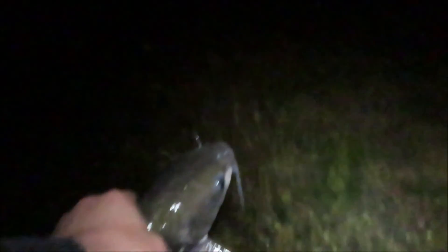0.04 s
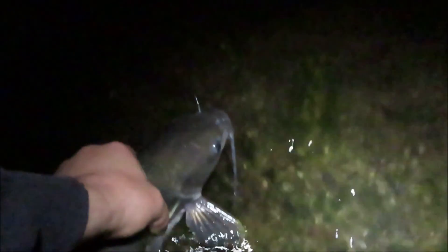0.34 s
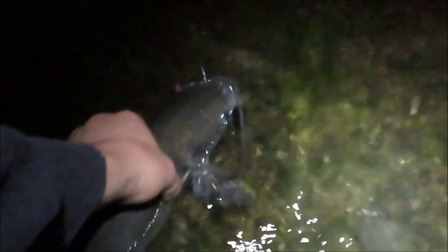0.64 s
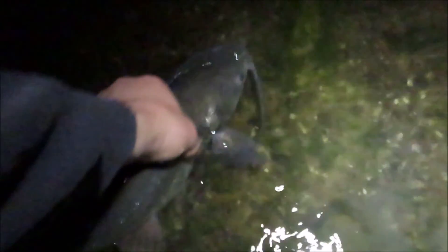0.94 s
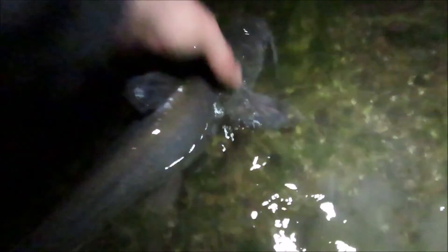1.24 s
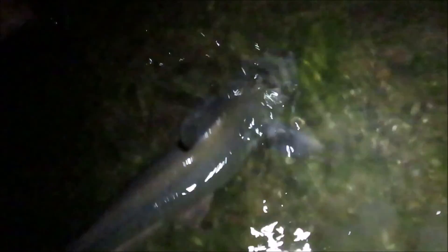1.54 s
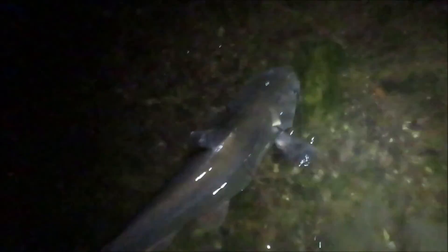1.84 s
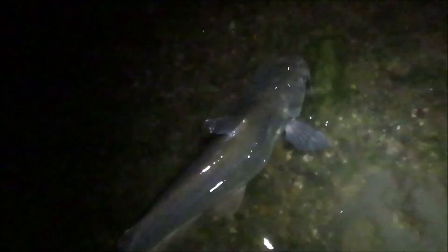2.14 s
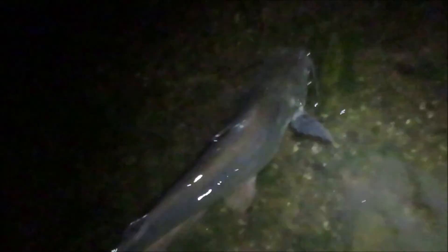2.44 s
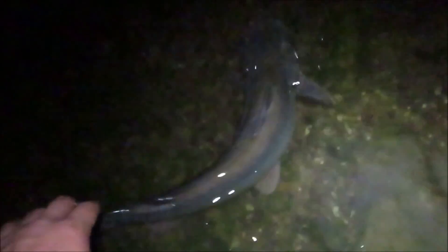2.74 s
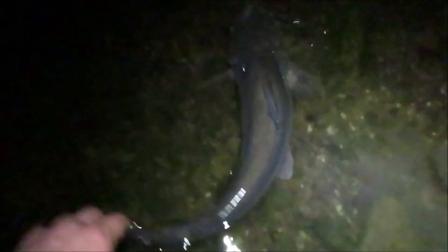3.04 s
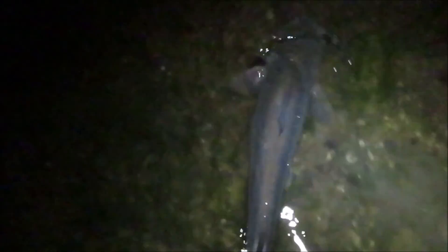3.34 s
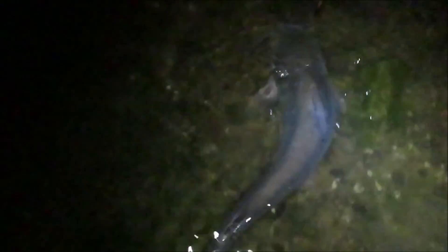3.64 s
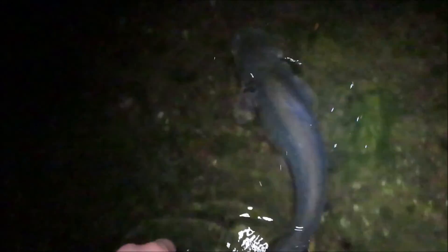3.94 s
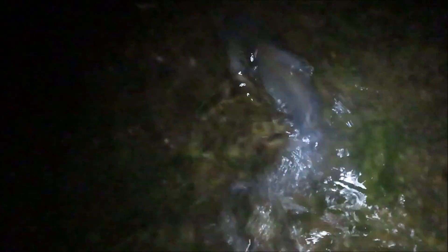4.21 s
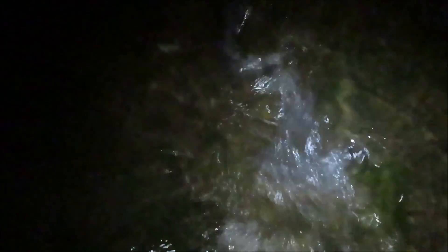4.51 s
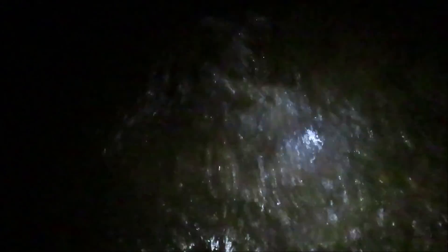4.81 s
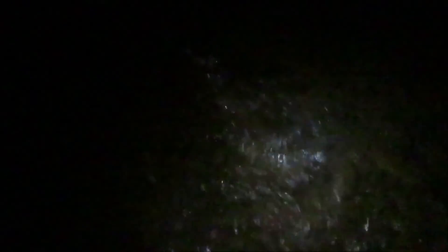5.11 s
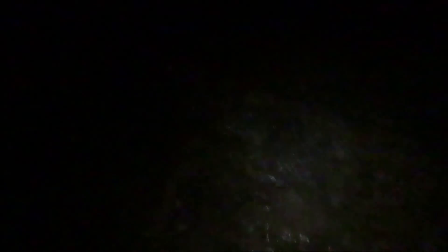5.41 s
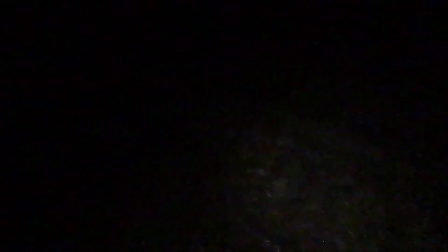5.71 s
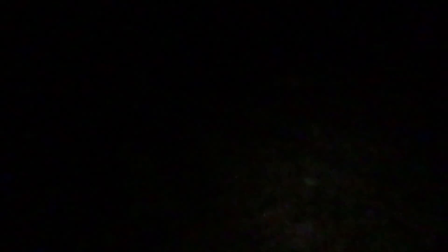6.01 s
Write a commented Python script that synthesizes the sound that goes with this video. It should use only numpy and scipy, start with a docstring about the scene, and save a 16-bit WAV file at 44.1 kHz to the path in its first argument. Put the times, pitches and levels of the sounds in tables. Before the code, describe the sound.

A large fish stirs in shallow water with small plops, then bolts with loud tail slaps and splashing, over faint night insects.

```python
"""Two distant insect choruses trill throughout, over the faint rumble of the night.
At first a hand holds a large fish in shallow water, which laps, drips and plops around it.
At 4.2 s the fish bolts: its tail slaps the surface, and the trapped air resonates in big gulps.
The water churns and spray rains back, each small bubble ringing at its own pitch.
From about 5 s the wake bubbles away and the last drops fall."""
import sys
import numpy as np
from scipy import signal
from scipy.fft import rfft, irfft, next_fast_len
from scipy.io import wavfile
from scipy.ndimage import map_coordinates

SR = 44100
rng = np.random.default_rng(int(sys.argv[2]) if len(sys.argv) > 2 else 0)


def bounce(signal):
    """Save signal as a 16-bit WAV file at the path given by the first command-line argument."""
    frames = np.transpose(np.atleast_2d(signal))
    limited = np.clip(frames, -1, 1)
    pcm = np.round(limited * 32767).astype(np.int16)
    wavfile.write(sys.argv[1], SR, pcm)


N = 267246

# Spectral shapes of the night air, the choruses and the splash: frequency_hz, relative_density_db
NIGHT_SPECTRUM = [(15, -36), (30, -27), (58, -5.5), (110, -3), (200, -3), (430, -5.5), (750, -11.5),
                  (1600, -15), (3100, -19), (5000, -23), (7000, -28.5), (10000, -33.5), (14000, -38),
                  (16000, -46)]
LOW_CHORUS_SPECTRUM = [(1500, -54), (1900, -8), (2040, -1), (2130, 4), (2260, 0.5), (2400, -9), (2900, -56)]
HIGH_CHORUS_SPECTRUM = [(3200, -35), (3650, -9.5), (3820, -1), (3930, 1.5), (4030, 2), (4160, -17),
                        (4600, -14), (5600, -42)]
CHURN_SPECTRUM = [(120, -15), (200, -5), (300, -13.5), (420, -2.5), (560, -0.5), (750, 1.5), (1100, 6),
                  (1600, -0.5), (2600, -22), (5000, -39)]
SPRAY_SPECTRUM = [(500, -52), (1200, -14), (1900, 2), (2900, 1), (4200, -4), (6000, -13.5), (9000, -28),
                  (15000, -7)]
MIST_SPECTRUM = [(2500, -13), (5000, -1), (7000, -4), (10000, -4.5), (13000, -3), (16000, -21)]
# Likeness of the night air at left and right: frequency_hz, correlation
NIGHT_CORRELATION = [(60, 1), (130, 0.68), (290, -0.1), (640, -0.042), (1410, 0.33), (3100, 0.36),
                     (6820, 0.44), (15000, 0.094)]
# Puffs of air on the microphone: peak_s, level_db, decay_s
AIR_PUFFS = [(.01, -50.5, 0.17), (.165, -39.5, .04), (4.57, -52, 0.046), (4.745, -51, 0.017)]
# Decay of the echo from the bank: frequency_hz, t60_s
BANK_DECAY = [(200, 0.081), (1500, 0.04), (5000, 0.04), (14000, 0.0093)]
# Hand and fins stir the water: peak_s, level_db, decay_s
WATER_STIRS = [(.05, -45.5, 0.18), (.42, -55, 0.52), (1.035, -44, 0.023), (1.16, -42, 0.075),
               (1.24, -47.5, 0.18), (2.2, -58, 0.079)]
# Bubbles that stand out: start_s, level_db, pitch_hz, ring_cycles, climb_octaves (negative acts as 0)
SINGLE_BUBBLES = [(.0428, -29, 356, 1.33, 2.5), (.1037, -31, 580, 2, 0), (.424, -24.5, 1620, 2.1, 0.3),
                  (.4644, -19.5, 1090, 3.2, 0), (.6415, -31.5, 3120, 6.7, 0), (.645, -35.5, 853, 42, 2),
                  (1.027, -33.5, 357, 2.1, 0), (1.058, -38, 5050, 17, 0), (1.078, -10, 980, 0.54, 1),
                  (1.0791, -20.5, 2040, 3.6, 0), (1.0785, -15.5, 385, 1.3, 0), (1.1244, -21, 412, .7, -0.5),
                  (1.126, -27.5, 950, 9.4, 0.23), (1.2, -28, 920, 7, 0.43), (1.302, -39, 1395, 16, 0.7),
                  (1.3425, -23.5, 820, 1.9, 0.36), (1.5501, -31.5, 1600, 2.3, 0.1),
                  (2.6852, -40.5, 1660, 10, 0.2), (4.2203, -9.5, 915, 5.1, 0.46),
                  (4.2554, -10.5, 533, 1.5, -1), (4.283, -20, 419.4, 18, -0.16),
                  (4.3148, -6.5, 825, 4.3, 0), (4.332, -14.5, 448, 4.3, 0), (4.3715, -21, 870, 7.6, 0.8),
                  (4.3781, -18, 314, 4.8, -0.06), (4.378, -10, 2760, 3.6, -0.05),
                  (4.386, -18.5, 3400, 15, 0.2), (4.445, -9.5, 1220, 3.5, 0.5), (4.4496, -23, 479, 11, 0),
                  (4.4992, -18.5, 533, 17, 0), (4.5174, -17, 2520, 11, 1), (4.5764, -13, 1810, 6.7, 0),
                  (4.5835, -10, 1040, 2.1, -1.3), (4.6438, -18, 803, 7.3, 0), (4.671, -14, 2860, 6.1, -0.6),
                  (4.7013, -18.5, 2045, 17, .1), (4.7873, -13.5, 2700, 6.2, 0),
                  (4.7875, -21, 1240, 6.6, 0.6), (4.8851, -30, 2267, 20, 1.4), (4.9202, -8, 1100, 3.5, 0),
                  (4.9211, -12, 1660, 2.7, 0.5), (5.0076, -18, 1920, 2.2, 1),
                  (5.0122, -22.5, 1020, 8.6, 1.3), (5.0167, -20.5, 1540, 7, .07),
                  (5.0678, -23.5, 610, 4, 1), (5.1182, -13, 1005, 3.8, .26),
                  (5.1256, -16.5, 575, 3.9, 0.35), (5.1307, -13.5, 506, 5.2, .93),
                  (5.1516, -15, 966, 3.6, -0.66), (5.184, -26.5, 375, 9.4, 0),
                  (5.214, -33.5, 584, 11.5, 0.7), (5.2705, -23, 683, 19, 0.24), (5.284, -29, 760, 17, 1.6),
                  (5.308, -18, 1510, 1.4, -2), (5.328, -37, 420, 27, -0.15), (5.334, -14.5, 1230, 3.2, 0),
                  (5.339, -16.5, 1870, 4.4, -1.6), (5.3763, -31, 703, 20, -1.5),
                  (5.4155, -36, 1124, 14, 0.5), (5.432, -35.5, 757, 12, .22), (5.515, -40.5, 592, 32, 0.6),
                  (5.5462, -28, 1910, 6.4, 0), (5.5617, -33, 1105, 12, 0.7), (5.6464, -24.5, 2000, 10, 0),
                  (5.68, -35, 1600, 11, 0.5), (5.735, -36, 1220, 19, 1.5), (5.7932, -32, 2910, 11, 0),
                  (5.8027, -14.5, 561, 3.9, 0.62), (5.8082, -24.5, 954, 5, 1.5),
                  (5.901, -32.5, 1120, 16, 0.2), (5.9208, -22, 2060, 9.7, .5),
                  (5.9545, -29.5, 579, 11.4, 0.7), (5.98, -37.5, 940, 19.5, 2.8),
                  (6.033, -40, 863, 12, 0.5)]
# Drops tick on the surface: start_s, level_db, centre_hz, half_width_octaves
DROP_TICKS = [(0.051, -29.5, 2200, 0.48), (.423, -40, 6750, .3), (0.456, -34, 13300, .09),
              (1.006, -36, 3300, .2), (1.043, -37.5, 8500, .25), (1.283, -38, 2700, .3),
              (1.3405, -23.5, 6200, 0.77), (1.728, -43, 14600, .12), (1.745, -47, 14500, .12),
              (2.160, -45, 9300, 0.23), (2.844, -42, 10000, 0.55), (4.370, -17.5, 5500, .2),
              (4.459, -12.5, 3430, 0.49), (4.535, -24, 7500, 0.26), (4.739, -24.5, 12500, 0.24),
              (4.830, -25, 8200, 0.2), (4.887, -16, 3530, .45), (5.008, -16, 4000, 0.53),
              (5.162, -26, 3170, .25), (5.24, -24, 2740, 0.25), (5.244, -25.5, 12300, 0.18),
              (5.334, -24.5, 8600, 0.44), (5.443, -39, 9500, .3), (5.568, -39, 7000, 0.86),
              (5.733, -19.5, 7000, 0.63), (5.891, -21, 2160, 0.36), (5.915, -30, 9400, 0.46)]
# Sheets of thrown water land: peak_s, churn_relative_db, spray_relative_db, decay_s
WATER_SHEETS = [(4.209, -17, -24, 0.02), (4.259, -21.5, -28.5, 0.013), (4.329, -24.5, -22, 0.02),
                (4.378, -22, -28, 0.022), (4.441, -22.5, -26, 0.055), (4.534, -27.5, -22, 0.025),
                (4.647, -29, -33.5, 0.037), (4.702, -43.5, -24.5, 0.014), (4.751, -54, -26, 0.014),
                (4.804, -36, -25, 0.024), (4.887, -49, -25, 0.021), (4.976, -31.5, -31, 0.021),
                (5.008, -27.5, -30, .018), (5.07, -30, -37, 0.01), (5.093, -61, -30.5, 0.025),
                (5.16, -36, -50, 0.012), (5.264, -33.5, -41.5, 0.042), (5.333, -34.5, -36.5, 0.02),
                (5.418, -38.5, -43.5, 0.028), (5.567, -46, -36.5, .01), (5.802, -37.5, -38.5, 0.015),
                (5.845, -44.5, -43, 0.027), (5.915, -46, -38, 0.02)]
# The tail strikes and traps a pocket of air: start_s, pocket_db, pocket_hz, ring_cycles, crack_db
TAIL_SLAPS = [(4.2087, 1.5, 1180, 1.5, -10), (4.296, -3, 485, 2.16, -24), (4.3814, -2.5, 853, 3.2, -24),
              (4.4189, 3.5, 860, 2.3, -15)]

BOLT_S, BUILD_S, AIRBORNE_S = 4.21, 0.16, 0.8  # the fish bolts; the wash's rise time; the spray's flight
SHEET_ATTACK_S, MIST_SHEET_DB = 0.0053, -12.5  # the mist's share of each sheet, relative to the spray
SLAP_CLIMB_OCTAVES, CRACK_PITCH_RATIO = 0.37, 2.93  # the pocket's pitch rise; crack pitch over pocket's
LOW_CHORUS_DB, HIGH_CHORUS_DB = -55.5, -54
SWELL_DB, SWELL_PERIOD_S, SWELL_PEAK_S = 1.2, 0.806, 2.43  # the high chorus swells and ebbs
BAND_LIMIT_HZ = 15900


def amp(db):
    """Amplitude ratio of a level in decibels."""
    return 10 ** (np.asarray(db) / 20)


def unit(x):
    """Normalisation to rms 1."""
    return x / np.sqrt(np.mean(x ** 2) + 1e-20)


def along(points, hz):
    """Interpolation of (frequency_hz, value) points on a logarithmic axis."""
    knots_hz, values = np.transpose(points)
    return np.interp(np.log(hz + 1), np.log(knots_hz + 1), values)


def wobble(rate_hz):
    """Random modulation: a smooth curve through Gaussian knots."""
    knots = rng.standard_normal(int(N * rate_hz / SR) + 4)
    return map_coordinates(knots, [np.arange(N) * rate_hz / SR])


def filtered(x, response):
    """Zero-phase filtering: the spectrum times a response of frequency."""
    size = next_fast_len(N + SR // 2)
    return irfft(rfft(x, size) * response(np.fft.rfftfreq(size, 1 / SR)), size)[..., :N]


def coloured(x, spectrum):
    """Minimum-phase filtering, so that no ringing precedes an onset; the result has rms 1."""
    size = 4096
    cepstrum = irfft(np.log(amp(along(spectrum, np.fft.rfftfreq(size, 1 / SR)))))
    cepstrum[1:size // 2] *= 2
    cepstrum[size // 2 + 1:] = 0
    impulse_response = irfft(np.exp(rfft(cepstrum)))
    return unit(signal.fftconvolve(x, impulse_response[None], axes=1)[:, :N])


def stereo_noise(spectrum, correlation):
    """Partly coherent noise of rms 1: the balance of mid and side sets the left-right correlation."""
    def response(hz):
        angle = np.arccos(np.clip(along(correlation, hz), -1, 1)) / 2
        return amp(along(spectrum, hz)) * [np.cos(angle), np.sin(angle)]
    mid, side = filtered(rng.standard_normal((2, N)), response)
    return unit(np.array([mid + side, mid - side]))


def swells(rows, attack_s):
    """Incoherent swells add in power; each rises and decays exponentially."""
    t = np.arange(N) / SR
    gains = (amp(db) * np.exp(np.minimum((t - peak_s) / attack_s, (peak_s - t) / decay_s))
             for peak_s, db, decay_s in rows)
    return np.sqrt(sum(gain ** 2 for gain in gains))


def add(track, start_s, sound):
    """Superposition of a sound on a track."""
    part = track[..., max(round(start_s * SR), 0):][..., :sound.shape[-1]]
    part += sound[..., :part.shape[-1]]


def night(draught_db=-68):
    """Ambient noise: far rumble and hiss, with slow pressure fluctuations of air on the microphone."""
    air_spectrum = [(12, -4), (25, -6), (45, 0), (80, -2.0), (160, -30), (400, -60), (1000, -100)]
    air = stereo_noise(air_spectrum, [(50, 0.84)])
    buffeting = np.hypot(swells(AIR_PUFFS, attack_s=.025), amp(draught_db)) * air
    return amp(-50.5) * stereo_noise(NIGHT_SPECTRUM, NIGHT_CORRELATION) + buffeting


def insects():
    """Incoherent summation: countless distant callers blur into two flickering bands of noise."""
    swell_db = SWELL_DB * np.cos(2 * np.pi * (np.arange(N) / SR - SWELL_PEAK_S) / SWELL_PERIOD_S)
    low_gain = amp(LOW_CHORUS_DB + 1.7 * wobble(35) + .7 * wobble(6))
    low = low_gain * stereo_noise(LOW_CHORUS_SPECTRUM, [(2100, 0.89)])
    high_gain = amp(HIGH_CHORUS_DB + swell_db + 1.3 * wobble(45) + 1.2 * wobble(8))
    high = high_gain * stereo_noise(HIGH_CHORUS_SPECTRUM, [(3900, 0.49)])
    return low + high


def bank_echo(x):
    """Diffuse scattering: the bank returns a short echo whose treble dies first."""
    hz, t, noise = signal.stft(rng.standard_normal((2, SR // 3)), SR, nperseg=256)
    decay = amp(-60 * t / along(BANK_DECAY, hz)[:, None])
    mid, side = signal.istft(noise * decay, SR, nperseg=256)[1]
    impulse_response = np.array([mid + 0.063 * side, mid - 0.05 * side]) / np.linalg.norm(mid)
    delayed = np.pad(x.mean(0), (SR // 300, 0))
    return signal.fftconvolve(delayed[None], impulse_response, axes=1)[:, :N]


def bubble(t, hz, life_s, octaves_per_s):
    """Minnaert resonance: trapped air rings, its pitch climbing as it nears the surface and bursts."""
    age = t / life_s
    octaves = np.minimum(octaves_per_s * t, 2)
    pitch_hz = np.minimum(hz * np.exp2(octaves), SR / 2)
    envelope = (1 - np.exp(-2 * hz * t)) * np.exp(-age * np.sqrt(age))
    intact = np.minimum((2 - octaves) * 4, 1)  # silent after a climb of two octaves
    return envelope * intact * np.sin(2 * np.pi * np.cumsum(pitch_hz, axis=-1) / SR)


def swarm(start_s, low_hz, high_hz, cycles, climb_octaves, spread_db, width, count, samples):
    """Independent resonators: random bubbles from start_s on, many faint and a few loud, at rms 1."""
    when, pitch, length, strength, place, lift = rng.random((count, 6)).T[:, :, None]
    hz = low_hz * (high_hz / low_hz) ** pitch
    life_s = np.minimum(cycles * 3 ** (2 * length - 1) / hz, samples / SR / 2)
    gain = amp(spread_db * -np.log(.03 + .97 * strength)) / np.sqrt(life_s)
    polarity = np.sign(rng.standard_normal((count, 1)))
    rings = gain * polarity * bubble(np.arange(samples) / SR, hz, life_s, 2 * climb_octaves * lift / life_s)
    onset_s = start_s + when * (N / SR - start_s)
    index = ((onset_s * SR).astype(int) + np.arange(samples)).ravel()
    pan = width * (2 * place - 1)
    channels = [np.bincount(index, (rings * (1 + side * pan)).ravel(), N)[:N] for side in (1, -1)]
    return unit(np.array(channels))


def plop(db, hz, cycles, climb_octaves, low_cut_hz=170):
    """One resonating bubble; a source small against the wavelength radiates little bass."""
    life_s = max(cycles, .5) / hz
    ring = amp(db) * bubble(np.arange(SR // 8) / SR, hz, life_s, max(climb_octaves, 0) / life_s)
    return signal.sosfilt(signal.butter(2, low_cut_hz, "highpass", fs=SR, output="sos"), ring)


def crack(db, centre_hz, half_width_octaves, decay_s=0.0012, spread=0.22):
    """Impact transient: a blow on the surface radiates a brief band of noise."""
    burst = rng.standard_normal((2, SR // 40)) * np.exp(-np.arange(SR // 40) / SR / decay_s)
    edges_hz = centre_hz * 2 ** (np.array([-1, 1]) * max(half_width_octaves, .03))
    band = signal.butter(2, np.minimum(edges_hz, SR / 2 - 1), "bandpass", fs=SR, output="sos")
    mid, side = signal.sosfilt(band, burst)
    return amp(db) / np.abs(mid).max() * np.array([mid + spread * side, mid - spread * side])


def lapping():
    """Air entrainment: hand and fins stir in small, heavily damped bubbles."""
    water = swarm(0, 276, 1740, cycles=2.4, climb_octaves=0.068,
                  spread_db=3.0, width=0.12, count=1300, samples=450)
    spectrum = [(120, -4), (300, 2), (700, -3.0), (1500, -7.5), (4000, -8)]
    return swells(WATER_STIRS, attack_s=0.037) * coloured(water, spectrum)


def plops_and_drips():
    """Resonance and impact: single bubbles ring and drops tick around the fish and in its wake."""
    out = np.zeros((2, N))
    for start_s, db, hz, cycles, climb_octaves in SINGLE_BUBBLES:
        add(out, start_s, plop(db, hz, cycles, climb_octaves))
    for start_s, db, centre_hz, half_width_octaves in DROP_TICKS:
        add(out, start_s, crack(db, centre_hz, half_width_octaves))
    return out


def wash(level_db, sag_db_per_s, fall_db_per_s, rest_db):
    """Two-slope decay: the gain builds, sags while water is airborne, then falls to a trickle."""
    age_s = np.maximum(np.arange(N) / SR - BOLT_S, 0)
    decay_db = level_db - sag_db_per_s * age_s - fall_db_per_s * np.maximum(age_s - AIRBORNE_S, 0)
    return np.hypot(np.minimum(age_s / BUILD_S, 1) * amp(decay_db), amp(rest_db))


def wake():
    """Buoyancy: once the spray is down, slow bubbles well up and ring among the last small drops."""
    landed_s = BOLT_S + AIRBORNE_S
    gurgle = swarm(landed_s, 437.4, 1300, cycles=10, climb_octaves=0.198,
                   spread_db=5.0, width=0.046, count=44, samples=4000)
    drops = swarm(landed_s, 2190, 11800, cycles=6.7, climb_octaves=0.061,
                  spread_db=3, width=0.5, count=220, samples=500)
    return (wash(-38.5, sag_db_per_s=4.5, fall_db_per_s=27, rest_db=-61) * gurgle
            + wash(-46.5, sag_db_per_s=5.5, fall_db_per_s=36, rest_db=-71) * drops)


def splash():
    """Smaller bubbles resonate higher: churned water gurgles, spray patters in clumps, mist fizzes."""
    churn = swarm(BOLT_S, 302.5, 1790, cycles=6.0, climb_octaves=0.096,
                  spread_db=2.0, width=0.027, count=1000, samples=1200)
    spray = swarm(BOLT_S, 1224, 6510, cycles=5.6, climb_octaves=0.066,
                  spread_db=5.0, width=0.13, count=4000, samples=400)
    mist = swarm(BOLT_S, 4110, 15040, cycles=10.4, climb_octaves=0.013,
                 spread_db=2.5, width=1.0, count=4200, samples=220)
    crackle = swarm(BOLT_S, 2850, 22000, cycles=0.64, climb_octaves=0,
                    spread_db=1.0, width=0.86, count=200, samples=80)
    share = np.sqrt(1 - BOLT_S / (N / SR))  # the swarms sound only after the bolt
    foam = share * (rng.standard_normal(N) + .5 * rng.standard_normal((2, N)))  # countless merged drops
    clumps = wobble(45)
    heave = swells([(s, db, decay_s) for s, db, _, decay_s in WATER_SHEETS], SHEET_ATTACK_S)
    shower = swells([(s, db, decay_s) for s, _, db, decay_s in WATER_SHEETS], SHEET_ATTACK_S)
    churn_gain = np.hypot(heave, wash(-26, sag_db_per_s=18, fall_db_per_s=14, rest_db=-57))
    spray_gain = np.hypot(shower, wash(-29.5, sag_db_per_s=10.5, fall_db_per_s=36, rest_db=-55))
    mist_gain = np.hypot(amp(MIST_SHEET_DB) * shower,
                         wash(-41.5, sag_db_per_s=4.5, fall_db_per_s=48, rest_db=-67))
    out = churn_gain * coloured(churn, CHURN_SPECTRUM)
    out += spray_gain * amp(1.1 * clumps) * coloured(spray + 0.65 * foam + 0.52 * crackle, SPRAY_SPECTRUM)
    out += mist_gain * amp(2 * clumps) * coloured(mist + 1.7 * foam + 0.57 * crackle, MIST_SPECTRUM)
    onset = np.clip((np.arange(N) / SR - BOLT_S) / 0.002, 0, 1)
    return onset * share * out


def tail_slaps():
    """Impact and cavity resonance: each slap cracks, and the air trapped under it gulps."""
    out = np.zeros((2, N))
    for start_s, db, hz, cycles, crack_db in TAIL_SLAPS:
        gulp = plop(db, hz, cycles, SLAP_CLIMB_OCTAVES)
        hit = crack(crack_db, CRACK_PITCH_RATIO * hz, half_width_octaves=0.35, decay_s=0.0018, spread=0.27)
        add(out, start_s, gulp)
        add(out, start_s, hit)
    return out


def scene():
    """Superposition: close water, slightly to the right, and its weak echo against the open night."""
    water = tail_slaps() + plops_and_drips() + splash() + wake() + lapping()
    return water * amp([[-.4], [.4]]) + amp(-18) * bank_echo(water) + insects() + night()


def record(dry):
    """Saturation and band limiting: peaks stop at full scale and the highest treble is removed."""
    return filtered(np.clip(dry, -1, 1), lambda hz: hz < BAND_LIMIT_HZ)


dry = scene()
out = record(dry)
bounce(out)
```